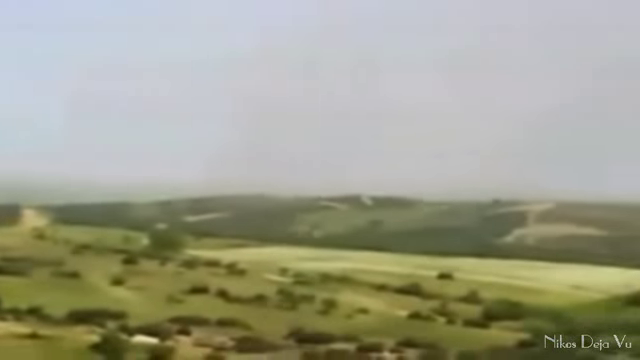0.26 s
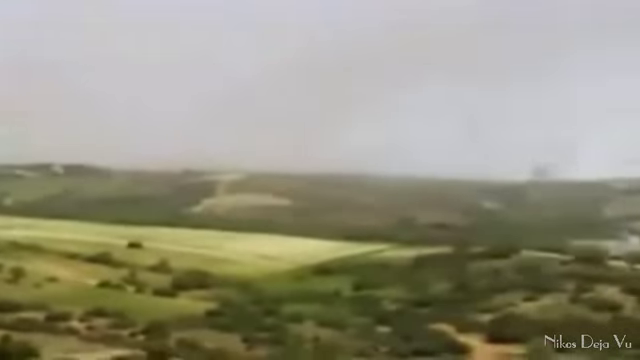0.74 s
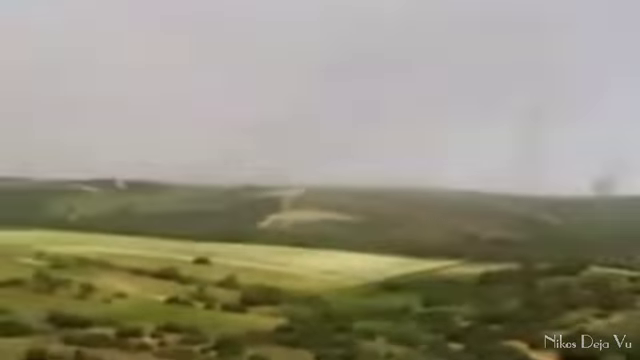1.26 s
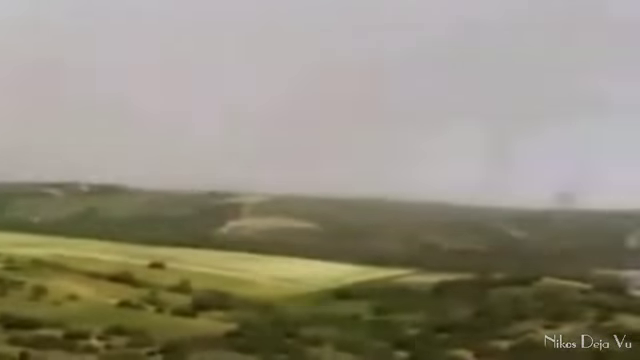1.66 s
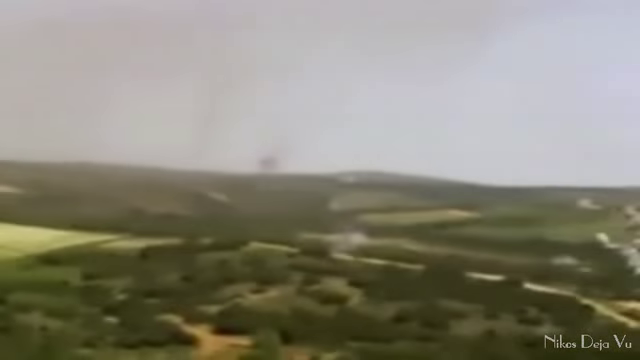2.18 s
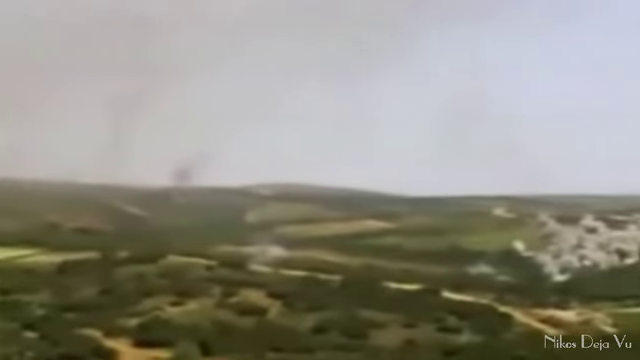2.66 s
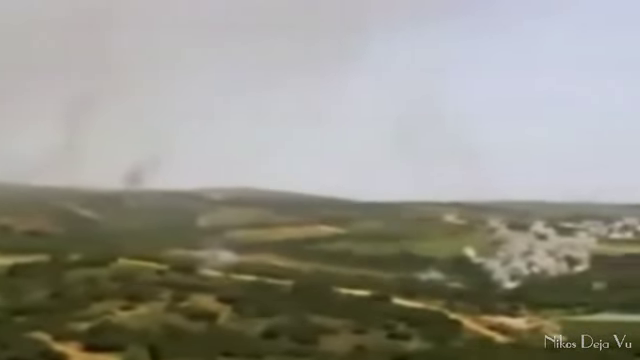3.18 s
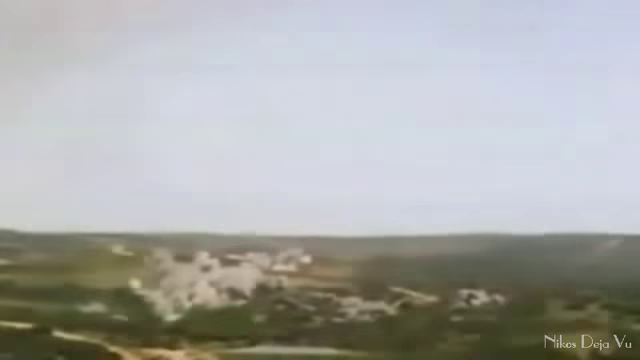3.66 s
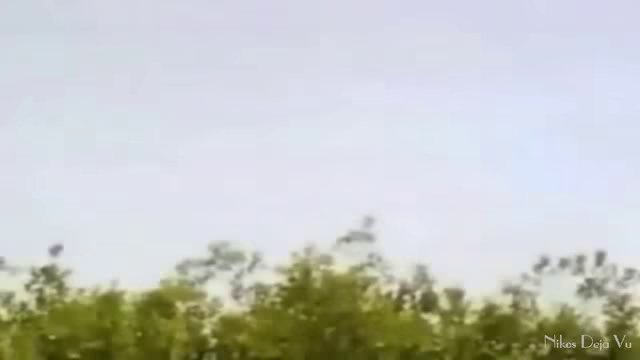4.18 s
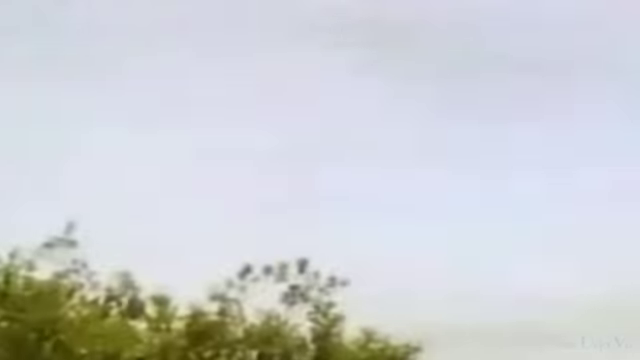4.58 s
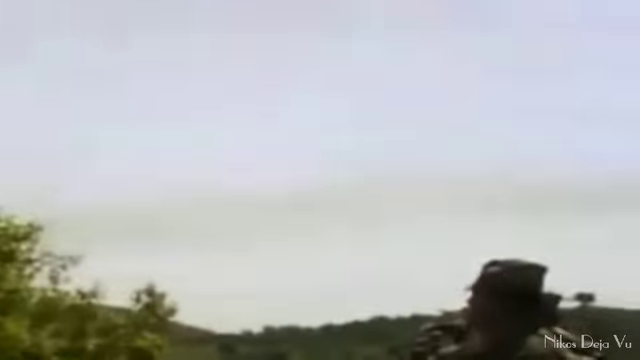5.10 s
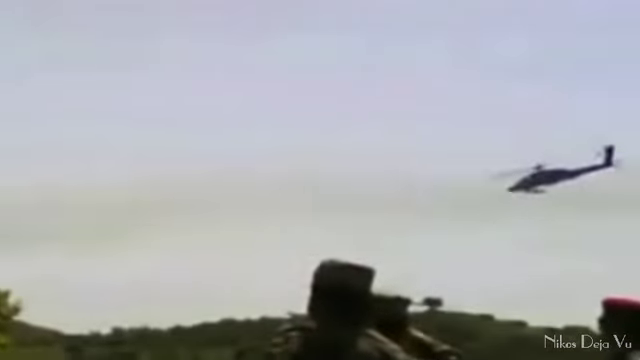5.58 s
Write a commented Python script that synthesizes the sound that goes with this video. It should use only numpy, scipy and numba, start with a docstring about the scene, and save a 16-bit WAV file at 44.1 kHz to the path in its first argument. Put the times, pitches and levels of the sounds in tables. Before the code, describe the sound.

Outdoors among hills, an attack helicopter drones softly beneath two loud rocket launches. The first rushing roar dies away around some muffled thumps; the second starts abruptly, rasping with a howl that rises and sinks before fading to a rumble. Then about a dozen cracking blasts land in quick, uneven succession with short slope echoes. A small microphone dulls the treble and flattens the loudest moments.

```python
"""Helicopter rocket attack

An attack helicopter passes low over open hills, its rotors and turbines a chopped wash over light wind.
Two rocket motors roar in turn: turbulent exhaust, crackling with small shocks, howling as they fly off.
Blast waves land, a few early, then a ragged string, each with a crack, a second shock and slope echoes.
A small microphone overloads on the loud peaks."""
import sys
import numpy as np
from scipy import signal
from scipy.fft import rfft, irfft, next_fast_len
from scipy.io import wavfile
from scipy.ndimage import uniform_filter1d
from numba import njit

SR = 44100
rng = np.random.default_rng(int(sys.argv[2]) if len(sys.argv) > 2 else 0)


def persist_wave(psi):
    """Save psi, clipped to +-1, as 16-bit WAV."""
    counts = np.round(np.clip(psi, -1, 1) * 32767).astype(np.int16)
    wavfile.write(sys.argv[1], SR, np.atleast_2d(counts).T)


N = 257544

# helicopter fader: t/s, level/dB
HELICOPTER_FADER = [(0, -19.5), (4.5, -33.5), (5.84, -29)]
# tone of the rotor wash and turbine exhaust: f/Hz, level/dB
WASH_EQ = [(15, -31.5), (25, 0), (70, 0), (159, -1), (492, -4), (672, -2.5), (1040, -10), (1170, -7.5),
           (2400, -12), (3280, -17.5), (3610, -24), (3880, -22), (5180, -36.5), (5570, -31.5), (7790, -56),
           (10100, -61.5), (17100, -120)]
# tone of the ignition cough: f/Hz, level/dB
COUGH_EQ = [(60, -6), (200, 4), (600, 2.5), (800, -16), (1100, -7), (2200, -21), (3000, -23), (8000, -60)]
# tone of each motor's roar: f/Hz, level/dB
FIRST_ROAR_EQ = [(18, -41.5), (40, -16.5), (90, -6.5), (150, 0), (280, 0), (425, -7.5), (640, -1),
                 (850, -9.5), (1200, -4.5), (2200, -7.5), (3300, -9), (3800, -14), (5760, -22),
                 (7790, -34.5)]
SECOND_ROAR_EQ = [(18, -36.5), (35, -9.5), (90, -1), (170, 0), (390, -6), (560, -2), (960, -4), (1400, -5),
                  (1700, -7.5), (2300, -8), (2800, -13), (4200, -14), (5620, -18), (7790, -34)]
SECOND_ROCKET_S = 1.633
# rocket flights: lit t/s, fade start t/s, level/dB, fade rate/(dB/s), rumble level/dB, howl peak t/s,
# howl level/dB, starting rasp f/Hz, starting rasp level/dB, rasp growth/(dB/s)
FLIGHTS = [ (-0.3125, 0.4475, -6, 18.5, -7.5, 2.1, 5.5, 1210.5, -0.5, -9.5),
           (SECOND_ROCKET_S, 3.356, -6, 25.4, -0.69, 2.4, 9.6, 1826, -1.3, 2.22), ]
# blast waves: t/s, level/dB, lag of the second shock/ms, dullness/(0-1), second shock level/dB
BLAST_CUES = [ (0.8, -8.5, 10, 0.7, -24), (0.9, -6, 14, 1, -23), (1.1445, -14.5, 18, .4, -16),
              (1.6319, -9, 15, 0.9, -2.5), (1.6976, -23, 22, 0, -16.5), (3.6017, -4, 8.3, 0.2, 1),
              (4.218, 0.5, 13.5, 0.26, -8), (4.4492, 1, 13.2, 0.19, -2), (4.5486, 0.5, 10.2, 0.3, -7),
              (4.7415, 0, 15.8, 0.58, 1.5), (4.894, 3, 14.1, 0.22, -5), (5.068, -1, 17.6, 0.74, -4),
              (5.3655, 3.5, 15.8, 0.25, 1), (5.484, 2.5, 13.2, 0.19, -2), (5.574, -10, 16, 0.5, -15),
              (5.5836, 2, 11.2, 0.17, -12), (5.7448, 0.5, 11.6, 0.19, -4), (5.7725, 2, 14.5, 0.33, -8), ]
# tone of a blast's crack, and of its echo off the slopes: f/Hz, level/dB
CRACK_EQ = [(200, -10), (400, 1), (620, 13), (1000, -0.5), (1800, 3), (2300, 0.5), (3200, -4.5), (4400, -6),
            (8000, -25)]
SLOPE_EQ = [(30, -6), (60, 0.5), (100, -11.5), (200, -3), (400, -7), (650, -14.5), (1000, -12), (2200, -4),
            (4000, -38.5), (8000, -55.5)]
# whip-like snaps where the sharpest pushes end: t/s, smack level/dB, zing level/dB
SNAP_CUES = [(4.2215, -1, -17), (4.5506, 3.5, 9.5)]


def undb(db):
    """Decibels to gain."""
    return 10 ** (np.asarray(db) / 20)


def unit(x):
    """Scale to rms 1."""
    return x / np.sqrt(np.mean(x ** 2))


def bell(x, centre, width):
    """A smooth hump, 1 at its centre."""
    return np.exp(-((x - centre) / width) ** 2)


def wobble(rate_hz):
    """Smooth random modulation: glides to a new value rate_hz times a second, rms 1."""
    hold = int(SR / rate_hz)
    steps = np.repeat(rng.standard_normal(N // hold + 1), hold)
    return unit(uniform_filter1d(steps, hold)[:N])


def eq(x, curve):
    """Minimum-phase EQ through the curve's points, so nothing rings ahead of a hit."""
    hz, db = np.transpose(curve)
    size = next_fast_len(len(x) + 4096) * 2
    f = np.maximum(np.arange(size // 2 + 1) * SR / size, 1)
    gain = undb(np.interp(np.log(f), np.log(hz), db))
    cepstrum = irfft(np.log(gain))
    cepstrum[1:size // 2] *= 2
    cepstrum[size // 2 + 1:] = 0
    return irfft(rfft(x, size) * np.exp(rfft(cepstrum)))[:len(x)]


def butter(x, hz, kind, order=2):
    """Butterworth low-pass or high-pass."""
    return signal.sosfilt(signal.butter(order, hz, kind, fs=SR, output="sos"), x)


def crossover(x, hz):
    """The bands below and above a frequency; they add up to the whole."""
    low = butter(butter(x, hz, "low")[::-1], hz, "low")[::-1]
    return low, x - low


@njit
def resonance(x, hz, width_hz):
    """Sweepable state-variable band-pass, gain 1 at the centre."""
    y, band_state, low_state = np.empty(len(x)), 0., 0.
    for i in range(len(x)):
        g, damping = np.tan(np.pi * hz[i] / SR), width_hz / hz[i]
        band = (band_state + g * (x[i] - low_state)) / (1 + g * (g + damping))
        band_state, low_state = 2 * band - band_state, low_state + 2 * g * band
        y[i] = damping * band
    return y


def wind(breeze_db=-45, buffet_db=-22, gust_db=3):
    """A light breeze, and one deep, uneven buffet as the microphone swings round."""
    strength = undb(breeze_db) + undb(buffet_db) * bell(np.arange(N) / SR, 3.2, .45)
    rumble = butter(butter(rng.standard_normal(N), 62, "low"), 28, "high")
    return unit(rumble) * strength * undb(gust_db * wobble(4.5))


def helicopter(main_blade_hz=19.5, tail_blade_hz=93, chop=0.069, buzz=0.17, hum_db=-14):
    """Broad rotor and turbine noise, chopped by the main blades and buzzing with the tail rotor."""
    level_db = np.interp(np.arange(N) / SR, *np.transpose(HELICOPTER_FADER))
    drift = 1 + 0.0024 * wobble(2.5)
    main, tail = (2 * np.pi * np.cumsum(hz * drift) / SR for hz in (main_blade_hz, tail_blade_hz))
    blades = 1 + chop * (np.cos(main) + np.cos(2 * main)) + buzz * np.cos(tail)
    wash = unit(eq(rng.standard_normal(N) * blades, WASH_EQ))
    hum = unit(sum(np.sin(k * tail) / k for k in range(1, 4))) * undb(1.1 * wobble(8.3))
    return (wash + undb(hum_db) * hum) * undb(level_db)


def hollow_tone(at_s=1.57, swell_s=0.16, centre_hz=590., width_hz=130., level_db=-25):
    """A hollow, breathy tone swells in the lull before the second launch."""
    breath = eq(rng.standard_normal(N), FIRST_ROAR_EQ)
    tone = unit(resonance(breath, np.full(N, centre_hz), width_hz))
    return tone * bell(np.arange(N) / SR, at_s, swell_s) * undb(level_db)


def ignition(level_db=-3, attack_ms=3, decay_ms=16):
    """The second motor lights with a short, hoarse cough."""
    ms = np.maximum(np.arange(N) / SR - SECOND_ROCKET_S, 0) * 1000
    envelope = (1 - np.exp(-ms / attack_ms)) * bell(ms, 0, decay_ms)
    return unit(eq(rng.standard_normal(N), COUGH_EQ)) * envelope * undb(level_db)


def exhaust(shocks_per_s=900, crackle_db=-9, spread_db=4.5):
    """Turbulent mixing noise, crackling with the small one-sided shocks of a supersonic jet."""
    hits = rng.random(N) < shocks_per_s / SR
    shocks = hits * undb(spread_db * np.minimum(rng.exponential(size=N), 2))
    return rng.standard_normal(N) + undb(crackle_db) * unit(shocks - shocks.mean())


def flight_loss(t, lit_s, fade_s, fade_db_per_s, swell_db=8.5, swell_s=0.44, sag_db_per_s=1.33):
    """A motor swells, sags, then fades into the distance: dB lost in all, and to the fade alone."""
    age = np.maximum(t - lit_s, 0)
    swell = swell_db * np.maximum(1 - age / swell_s, 0)
    sag = sag_db_per_s * np.maximum(np.minimum(t, fade_s) - lit_s - swell_s, 0)
    knee_s = 0.12
    fade = fade_db_per_s * knee_s * np.logaddexp(0, (t - fade_s) / knee_s)
    return swell + sag + fade, fade


def howl(roar, t, peak_s, db, rest_hz=540, rise_hz=326, arc_s=0.45):
    """A resonance in the roar rises and sinks once, faint before its peak and lingering after it."""
    arc = bell(t, peak_s, arc_s)
    duck_db = np.where(t < peak_s, -16, -10.5) * (1.5 - arc)
    return resonance(roar, rest_hz + rise_hz * arc, width_hz=150.) * undb(db + duck_db)


def rockets(flutter_db=1.2, rasp_octaves_per_s=0.31, dull_db=-19, rumble_swell_db=9):
    """Two motors roar in turn; their resonances shift as they fly and the air takes the treble."""
    t = np.arange(N) / SR
    out = np.zeros(N)
    for flight, roar_eq in zip(FLIGHTS, (FIRST_ROAR_EQ, SECOND_ROAR_EQ)):
        (lit_s, fade_s, db, fade_db_per_s, rumble_db,
         howl_s, howl_db, rasp_hz, rasp_db, rasp_db_per_s) = flight
        age = t - lit_s
        loss_db, fade_db = flight_loss(t, lit_s, fade_s, fade_db_per_s)
        roar = unit(eq(exhaust(), roar_eq))
        rasp = resonance(roar, rasp_hz * 2 ** (rasp_octaves_per_s * age), width_hz=800.)
        rasp *= undb(rasp_db + rasp_db_per_s * age)
        rumble, upper = crossover(roar + howl(roar, t, howl_s, howl_db) + rasp, 300)
        body, treble = crossover(upper, 3520)
        # the rumble comes late, blooming 7 dB into the fade
        rumble *= undb(rumble_db + rumble_swell_db * bell(fade_db, 7, 2))
        # the weaker the roar, the duller
        treble *= undb(dull_db * np.tanh(loss_db / 10.5) + flutter_db * wobble(50))
        body *= undb(flutter_db * wobble(45))
        out += (rumble + body + treble) * undb(db - loss_db) * (age > 0)
    return out


def nearby_echo(x, lag_s=0.00238, gain=0.088, top_hz=1900):
    """One short, inverted reflection gives the roar a hollow colour."""
    t = np.arange(N) / SR
    return x - gain * np.interp(t - lag_s, t, butter(x, top_hz, "low", order=1), left=0)


def shock(ms, push_ms, lag_ms, second_db, dull):
    """A short push, a longer suction and a second shock; the microphone flips the polarity."""
    def lobe(start_ms, rise_ms, decay_ms):
        """A quick rise and an exponential fall."""
        age = np.maximum(ms - start_ms, 0)
        return (1 - np.exp(-(age / rise_ms) ** 2)) * np.exp(-age / decay_ms)
    push = np.abs(np.sin(np.pi * np.minimum(ms / push_ms, 1))) ** (.6 + dull / 2)
    suction = 0.43 * lobe(push_ms, rise_ms=1.1, decay_ms=8)
    second = 2 * undb(second_db) * lobe(lag_ms, rise_ms=2.27, decay_ms=2.5)
    return -push + suction - second


def ground_scatter(wave, ms, push_ms, decay_ms=14, send_db=-31):
    """Every blast finds its own paths over the rough ground, smearing into a short tail."""
    paths = butter(rng.standard_normal(len(ms)), 900, "low") * (ms > push_ms) * np.exp(-ms / decay_ms)
    return undb(send_db) * butter(signal.fftconvolve(wave, paths)[:len(ms)], 200, "high")


def crack(ms, lag_ms, top_hz, peak_ms=1.39, tail_ms=15):
    """The front tears into quick cracks; their scattered tail and the second shock's are duller."""
    grit = butter(unit(eq(rng.standard_normal(len(ms)), CRACK_EQ)), top_hz, "low", order=3)
    tearing = ms / peak_ms * np.exp(1 - ms / peak_ms)
    tail = undb(-12) * (1 - np.exp(-ms)) * np.exp(-ms / tail_ms)
    second = undb(-13) * bell(ms, lag_ms + 2, 5)
    return grit * tearing + butter(grit, 2600, "low") * (tail + second)


def slope_echo(x, predelay_s=.016, slap_s=0.03, roll_s=0.16):
    """The hillsides throw back a dense slap and a longer, quieter roll."""
    t = np.arange(SR) / SR
    decay = undb(-35.5) * np.exp(-t / slap_s) + undb(-46.5) * np.exp(-t / roll_s)
    response = eq(rng.standard_normal(SR) * decay * (t > predelay_s), SLOPE_EQ)
    return signal.fftconvolve(x, response)[:N]


def blasts(push_share=0.186, front_hz=2900, crack_hz=8100, dull_octaves=1.8):
    """Each burst sends a blast wave with a cracking front; the ground scatters it, the slopes echo."""
    ms = np.arange(SR // 4) / SR * 1000
    out = np.zeros(N + len(ms))
    for at_s, db, lag_ms, dull, second_db in BLAST_CUES:
        push_ms = push_share * lag_ms
        darken = 2 ** (-dull_octaves * dull)
        wave = butter(shock(ms, push_ms, lag_ms, second_db, dull), front_hz * darken, "low", order=3)
        wave += ground_scatter(wave, ms, push_ms)
        wave += undb(-4.5 - 23 * dull) * crack(ms, lag_ms, crack_hz * darken)  # dull ones barely crack
        start = int(at_s * SR)
        out[start:start + len(ms)] += undb(db) * wave
    return out[:N] + slope_echo(out[:N])


def snaps():
    """Two blasts carry a whip-like snap: a hard smack and a bright zing, each a few cycles long."""
    t = np.arange(N) / SR
    def ping(at_s, db, hz, width_ms):
        """A short swing of pressure."""
        return undb(db) * np.sin(2 * np.pi * hz * (t - at_s)) * bell(t, at_s, width_ms / 1000)
    return sum(ping(at_s, smack_db, hz=1950, width_ms=0.64) + ping(at_s, zing_db, hz=5200, width_ms=0.19)
               for at_s, smack_db, zing_db in SNAP_CUES)


def scene():
    """Mono mix: rockets and blasts over a bed of helicopter and wind."""
    motors = nearby_echo(rockets() + ignition() + hollow_tone())
    return (motors + blasts() + snaps() + helicopter() + wind())[None]


def record(dry, ceiling=0.61, rolloff_hz=6600, top_hz=7950):
    """A small microphone flattens loud peaks and loses the deepest bass and the top."""
    x = butter(dry, 17, "high", order=1)
    x = x / (1 + (x / ceiling) ** 4) ** (1 / 4)  # soft saturation
    x = butter(x, 18, "high", order=1)
    x = butter(x, rolloff_hz, "low", order=4)
    return signal.sosfilt(signal.ellip(10, .2, 80, top_hz, fs=SR, output="sos"), x)


dry = scene()
out = record(dry)
persist_wave(out)
```